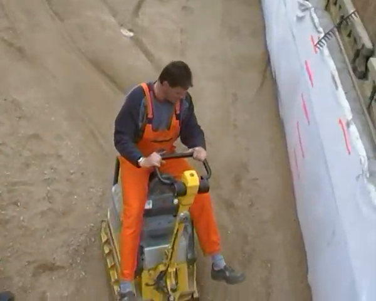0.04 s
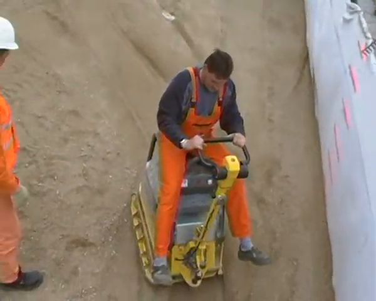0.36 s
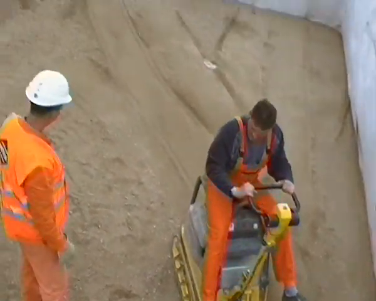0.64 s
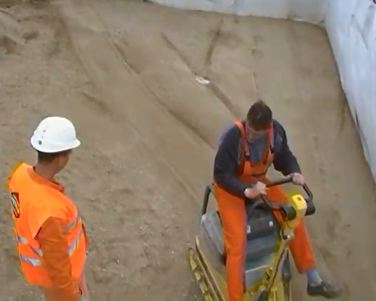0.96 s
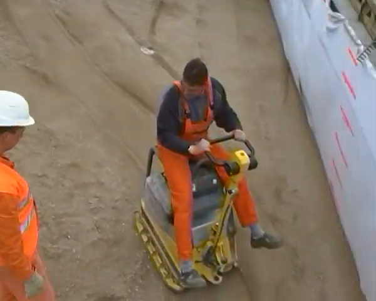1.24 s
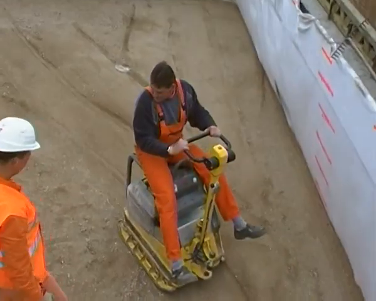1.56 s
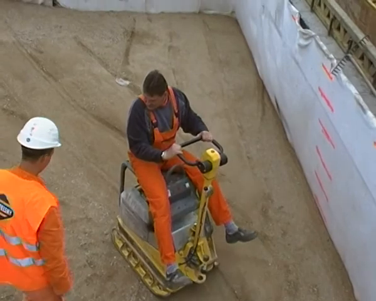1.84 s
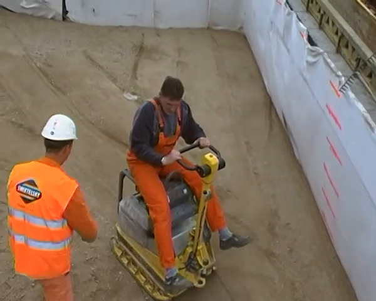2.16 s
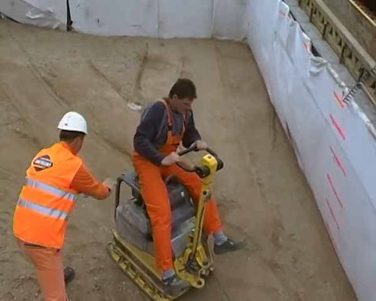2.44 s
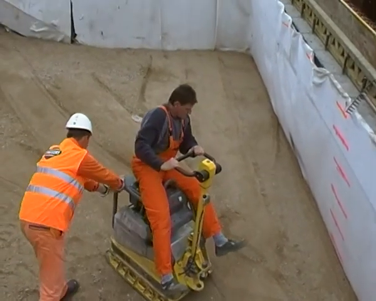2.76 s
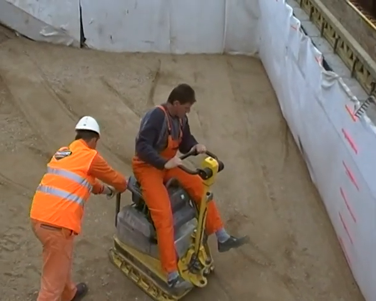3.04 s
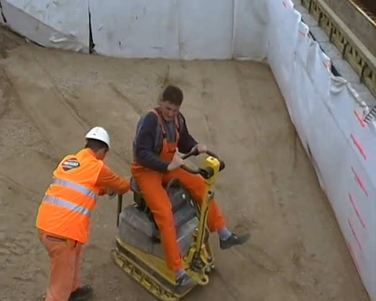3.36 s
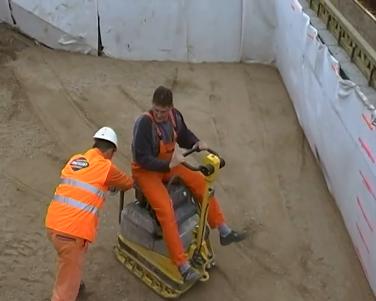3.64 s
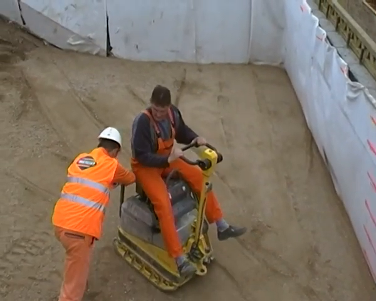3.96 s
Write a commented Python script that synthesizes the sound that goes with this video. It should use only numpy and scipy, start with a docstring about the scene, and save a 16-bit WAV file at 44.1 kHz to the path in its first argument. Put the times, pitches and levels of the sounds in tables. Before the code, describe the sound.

A heavy plate compactor runs with a deep, steady drone and diesel clatter.

```python
"""A heavy plate compactor pounds sandy ground in a building pit, a few metres away.
Its base plate thuds about 66 times a second and rocks, so that every other thud differs.
Grit crunches under it. The one-cylinder diesel engine runs at its own governed speed,
with exhaust throb, combustion knock, valve clatter and injector tick.
Panels and loose metal parts ring, the ground rumbles, and the pit walls spread the sound."""
import sys
import numpy as np
from scipy import signal
from scipy.fft import rfft, irfft, next_fast_len
from scipy.io import wavfile
from scipy.ndimage import uniform_filter1d

SR = 44100
rng = np.random.default_rng(int(sys.argv[2]) if len(sys.argv) > 2 else 0)


def digitize_waveform(pressure):
    """Quantize a signal to 16-bit integers and store it at the path in sys.argv[1].

    Rows of a 2-D input are taken as channels; values are limited to [-1, 1].
    """
    field = np.atleast_2d(pressure).T
    bounded = np.clip(field, -1, 1)
    quanta = np.round(bounded * 32767).astype(np.int16)
    wavfile.write(sys.argv[1], SR, quanta)


N = 176400

# wall reflections (frequency [Hz], side minus mid [dB])
WALL_WIDTH = [(60, -5), (250, -17.5), (500, -17), (1000, -17), (2200, -12.5), (4000, -9), (8000, -0.5),
              (11000, -6), (12500, 1)]
# microphone balance (frequency [Hz], left minus right [dB])
BALANCE = [(60, -.6), (300, -.1), (700, -.1), (1200, 1), (2100, 2.2), (3700, -.6), (6600, .5), (12000, -.6)]

# spectra of ground and metal parts (frequency [Hz], relative spectral density [dB])
RUMBLE_SPECTRUM = [(12, 8), (28, 3), (65, 15), (130, .5), (170, -5.5), (260, -1), (450, -8.5),
                   (1000, -30), (4000, -77)]
GRIT_SPECTRUM = [(100, -30.5), (250, 3), (400, 0.5), (600, 1), (1000, 2), (1500, -6.5), (2600, -1.5),
                 (3300, -5.5), (4800, -24.5), (6500, -21), (8500, -24.5), (11000, -25.5), (13000, -46)]
RING_SPECTRUM = [(1500, -60), (2450, -33), (2570, 0), (2615, 2), (2670, -9), (2740, 0.5), (2800, -32),
                 (4000, -56)]
CLACK_SPECTRUM = [(300, -15), (2000, 1), (6500, -9), (9000, -8), (12500, -12)]
PING_SPECTRUM = [(2500, -40), (3750, -6), (4000, 0), (4250, -15), (6000, -42)]
KNOCK_SPECTRUM = [(200, -6), (600, -3.5), (1200, 1), (1550, -1.5), (1950, 7.5), (2650, -5.5), (3100, -17.5),
                  (4200, -15), (5500, -24), (6600, -47), (8500, -23), (12000, -52)]
VALVE_SPECTRUM = [(200, -24), (600, 1), (1200, 1), (2000, 2), (2700, -3), (3200, -10), (4200, -2.5),
                  (5400, -9.5), (6500, -24.5), (8000, -16.5), (10400, -16.5), (12000, -29)]
TICK_SPECTRUM = [(3000, -45), (6600, -44), (7000, -18), (7170, 4), (7330, -17), (7600, -16), (7850, 12.5),
                 (8100, -24), (8330, -17), (8490, 2.5), (8700, -4), (9500, -29), (9930, -29), (10100, -15),
                 (10300, -22), (10800, -19), (12500, -30)]
PANEL_SPECTRUM = [(250, -34), (500, -1.5), (660, -3), (780, -3.5), (920, 1.5), (1060, -4), (1230, 0.5),
                  (1350, -5.5), (1460, 1.5), (1800, -11), (4000, -34)]
# strength of grit, thin metal part and casing panels (time [s], level [dB])
GRIT_LEVEL = [(0, -34.5), (.9, -34.5), (1.6, -33.5), (2.3, -32.5), (3, -32.5), (3.4, -32), (3.75, -31),
              (4, -32)]
RING_LEVEL = [(0, -54), (.7, -43), (1.3, -44), (2, -45), (2.6, -46), (3.2, -44), (4, -40)]
PANEL_LEVEL = [(0, -39), (.6, -39), (.9, -39), (1.4, -47), (1.8, -39.5), (2.3, -35.5), (2.8, -34.5),
               (3.3, -36.5), (3.75, -31.5), (4, -39)]
# strikes of loose metal (time [s], envelope peak [dB])
CLACKS = [(.308, -37), (2.582, -37), (3.381, -35), (3.722, -29)]
PINGS = [(.1, -38), (.142, -38), (.311, -38), (.436, -41), (.563, -38)]

# engine speed (time [s], firing rate [Hz])
FIRING_RATE = [(0, 23.73), (.8, 23.71), (1.3, 23.68), (2.3, 23.71), (3, 23.62), (4, 23.63)]
# exhaust tones (multiple of the firing rate, level [dB])
EXHAUST_HARMONICS = [(2, -27), (3, -42), (4, -35), (5, -35), (6, -40), (7, -43), (8, -42), (9, -39),
                     (10, -38), (11, -45), (12, -41), (13, -45), (14, -45)]
# impacts within one engine cycle (delay after firing [cycles], relative level [dB])
KNOCKS = [(0, 0), (.09, -2.5), (.27, -6), (.36, -6), (.6, -10), (.8, -11)]
VALVE_HITS = [(.02, -4), (.09, -4), (.25, -1), (.33, -1), (.44, -4), (.66, -5), (.8, -5), (.92, -8)]
TICKS = [(0, 0), (.07, -3), (.26, -5), (.36, -6)]
PANEL_HITS = [(.04, 0), (.18, -4), (.32, 0), (.5, -2), (.68, -4), (.82, -2)]
# directivity as the machine turns (time [s], knock gain [dB], valve gain [dB])
FACING = [(0, -0.5, -4.5), (.5, -3.5, -3.5), (.85, -3, -1.5), (1.1, -4, 2), (1.5, -0.5, .5), (1.8, -5, -.5),
          (2.2, -5.5, -2), (2.75, -5, -0.5), (3, -1, -1), (3.4, 1, 0), (3.6, -1.5, -1.5), (3.72, 1, 1),
          (4, 0.5, -1)]
# the same for the injector (time [s], gain [dB])
TICK_FACING = [(0, -4.5), (1, -12.5), (1.4, -3), (2.2, -5.5), (2.7, 1), (3.5, 2), (4, -0.5)]

# speed of the plate's shaker (time [s], thud rate [Hz])
THUD_RATE = [(0, 66.27), (.4, 66.28), (1.1, 66.12), (1.7, 66.02), (2.05, 66.12), (2.5, 66.02),
             (2.85, 66.85), (3.05, 66.72), (3.5, 67.1), (3.75, 67.15), (4, 66.7)]
# partials of the thuds, and those rocking adds between them (multiple of the thud rate, level [dB])
THUD_HARMONICS = [(1, -10.5), (2, -17), (4, -39.5), (8, -48.5), (9, -53.5), (10, -45.5)]
ROCKING_PARTIALS = [(.5, -30), (1.5, -19.5), (2.5, -36), (3.5, -35.5), (4.5, -43), (6.5, -44), (7.5, -47)]
# contact with the ground (time [s], gain of low rocking partials [dB], gain of thud overtones [dB])
GROUND_CONTACT = [(0, 6, 2), (.3, -9, 0), (.9, 2, -.5), (1.5, 0.5, -3), (2.1, 2, -1.5), (2.5, 0.5, 0.5),
                  (3, -3, 0.5), (3.4, -5.5, 2), (4, -14, 2.5)]
# drone of the body (time [s], then a level [dB] for each multiple of the thud rate below)
DRONE_LEVELS = [(0, -45, -39, -43, -27, -29), (.33, -36, -50, -33, -27.5, -31),
                (.55, -33, -47, -37.5, -31, -55), (.8, -31, -42, -30.5, -31, -51),
                (1.05, -30.5, -39, -34.5, -39, -36), (1.35, -33, -55, -43, -41, -35),
                (1.9, -30, -46, -42.5, -39.5, -41.5), (2.3, -32.5, -57, -35.5, -53, -36.5),
                (2.6, -27.5, -43.5, -37.5, -48, -62), (3.35, -27.5, -36.5, -44, -45.5, -47),
                (4, -29.5, -33.5, -39, -36.5, -33)]
DRONE_MULTIPLES = (3, 5, 5.5, 6, 7)


def amp(db):
    """Amplitude ratio of a level in decibels."""
    return 10 ** (np.asarray(db) / 20)


def unit(x):
    """Normalisation to rms 1."""
    return x / np.sqrt(np.mean(x ** 2))


def curve(table, column=1):
    """Linear interpolation of a time table at every sample."""
    rows = np.array(table, float)
    return np.interp(np.arange(N) / SR, rows[:, 0], rows[:, column])


def colour(x, spectrum):
    """Zero-phase filtering by a table of (frequency [Hz], gain [dB])."""
    hz, db = np.array(spectrum, float).T
    size = next_fast_len(N + 8192)
    bin_hz = np.maximum(np.arange(size // 2 + 1) * SR / size, 1)
    gain = amp(np.interp(np.log(bin_hz), np.log(hz), db))
    return irfft(rfft(x, size) * gain, size)[..., :N]


def walk(rate_hz):
    """Smooth random fluctuation of rms 1."""
    knots = rng.standard_normal(1024)
    path = np.interp(np.arange(N) / SR * rate_hz, np.arange(len(knots)), knots)
    return unit(uniform_filter1d(path, 200))


def spread(pair, spectrum):
    """Decorrelation: two unrelated signals serve as direct sound (mid) and wall reflections (side)."""
    mid, side = colour(pair, spectrum)
    return unit(mid) + colour(unit(side), WALL_WIDTH) * np.array([[1], [-1]])


def ground_rumble():
    """Random vibration of the ground: noise with its energy at low frequencies."""
    return amp(-27.5) * spread(rng.standard_normal((2, N)), RUMBLE_SPECTRUM)


def thin_metal(shake):
    """Resonance: continual shaking keeps a thin part ringing in a narrow band."""
    return amp(curve(RING_LEVEL)) * spread(shake * rng.standard_normal((2, N)), RING_SPECTRUM)


def loose_metal(strikes, spectrum, decay_s):
    """Damped free vibration: each strike of a loose part decays exponentially."""
    t = np.arange(N) / SR
    envelope = sum(amp(db) * (t > at) * np.exp(-np.abs(t - at) / decay_s) for at, db in strikes)
    return envelope * spread(rng.standard_normal((2, N)), spectrum)


def clatter(cycles, shake, impacts, spectrum, ring_s, rattle_share):
    """Impulse response: each impact of the cycle rings the casing its own way, with some loose rattle."""
    rise_s, jitter_s, scatter_db = .00033, .000025, 1.3
    age = np.arange(4096) / SR
    fade = np.exp(-age / ring_s) * (1 - np.exp(-age / rise_s))
    rings, power = 0, 0
    for delay, db in impacts:
        due = np.arange(np.floor(cycles[-1]) + 1) + delay
        timing, strength = rng.standard_normal((128, 2))[:len(due)].T
        at = np.interp(due, cycles, np.arange(N)) + jitter_s * SR * timing
        at = np.clip(at, 0, N - 1).astype(int)
        hits = np.zeros(N)
        hits[at] = amp(db + scatter_db * strength) * shake[at]
        response = fade * rng.standard_normal((2, len(age)))
        rings = rings + signal.oaconvolve(hits[None], response, axes=1)[:, :N]
        power = power + hits ** 2
    envelope = np.sqrt(np.abs(signal.oaconvolve(power, fade ** 2)[:N]))
    rattle = envelope * rng.standard_normal((2, N))
    mix = np.sqrt(1 - rattle_share) * unit(rings) + np.sqrt(rattle_share) * unit(rattle)
    return spread(mix, spectrum)


def engine_casing(cycles, shake):
    """Structure-borne sound: the casing radiates knock, valve and injector impacts and panel ringing."""
    knock = clatter(cycles, shake, KNOCKS, KNOCK_SPECTRUM, ring_s=.0095, rattle_share=.08)
    valves = clatter(cycles, shake, VALVE_HITS, VALVE_SPECTRUM, ring_s=.011, rattle_share=.2)
    injector = clatter(cycles, shake, TICKS, TICK_SPECTRUM, ring_s=.0064, rattle_share=.083)
    panels = clatter(cycles, shake, PANEL_HITS, PANEL_SPECTRUM, ring_s=.009, rattle_share=.1)
    return (amp(-34 + curve(FACING)) * knock
            + amp(-33.5 + curve(FACING, column=2)) * valves
            + amp(-53 + curve(TICK_FACING)) * injector
            + amp(curve(PANEL_LEVEL)) * panels)


def exhaust(cycles):
    """Periodic flow: the silencer throbs at harmonics of the firing rate."""
    return np.sqrt(2) * sum(amp(db + walk(8.9)) * np.sin(2 * np.pi * (k * cycles + rng.random()))
                            for k, db in EXHAUST_HARMONICS)


def grit(turns):
    """Shot noise: grains of sand and gravel crack at random, pulsing in level with the thuds."""
    grains_per_s, scatter_db, pulse_db = 3000, 1.5, -4
    grains = (rng.random((2, N)) < grains_per_s / SR) * rng.choice([-1, 1], (2, N))
    strength = amp(scatter_db * np.minimum(rng.exponential(size=(2, N)), 5))
    pulse = amp(pulse_db * np.cos(2 * np.pi * (turns - .15)))
    return spread(grains * strength * pulse, GRIT_SPECTRUM) * amp(curve(GRIT_LEVEL))


def base_plate(turns):
    """Period doubling: rocking adds half-integer partials to the thuds' harmonics; the body drones."""
    angle = 2 * np.pi * (turns + .0035 * walk(45))
    rocking_db = curve(GROUND_CONTACT) + .4 * walk(54)
    hardness_db = curve(GROUND_CONTACT, column=2) + .37 * walk(24.7)
    waver = lambda k: amp(.14 * k * walk(16))  # higher partials are less steady
    thuds = sum(amp(db + hardness_db * (k > 1)) * waver(k) * np.cos(k * angle)
                for k, db in THUD_HARMONICS)
    rocking = sum(amp(db + rocking_db * (k < 4)) * waver(k) * np.sin(k * angle)
                  for k, db in ROCKING_PARTIALS)
    drone = sum(amp(curve(DRONE_LEVELS, column) + 1.4 * walk(14)) * np.cos(k * angle)
                for column, k in enumerate(DRONE_MULTIPLES, 1))
    return -np.sqrt(2) * (thuds + rocking + drone)


def scene():
    """Superposition: plate and engine, each at its own speed, sound over the rumble of the ground."""
    thud_hz, firing_hz = curve(THUD_RATE), curve(FIRING_RATE)
    first_thud_s, first_firing_s = .00487, .0012
    turns = np.cumsum(thud_hz) / SR - first_thud_s * thud_hz[0]
    cycles = np.cumsum(firing_hz) / SR - first_firing_s * firing_hz[0]
    # the shaking peaks once per rocking cycle (two thuds) and surges at random
    shake_db, lag_cycles, surge_db = 1.4, .85, .55
    shake = amp(shake_db * np.cos(2 * np.pi * (turns / 2 - lag_cycles)) + surge_db * walk(12))
    casing = engine_casing(cycles, shake)
    clacks = loose_metal(CLACKS, CLACK_SPECTRUM, decay_s=.008)
    pings = loose_metal(PINGS, PING_SPECTRUM, decay_s=.014)
    return (ground_rumble() + base_plate(turns) + exhaust(cycles) + casing
            + grit(turns) + clacks + pings + thin_metal(shake))


def record(dry):
    """Frequency response: two microphones differ a little in colour, and a low-pass cuts the top."""
    pair = np.array([colour(channel, [(hz, side * db / 2) for hz, db in BALANCE])
                     for channel, side in zip(dry, (1, -1))])
    low_pass = signal.ellip(8, .2, 80, 11900, fs=SR, output="sos")
    return signal.sosfilt(low_pass, pair)


dry = scene()
out = record(dry)
digitize_waveform(out)
```